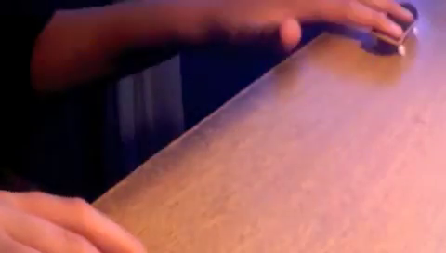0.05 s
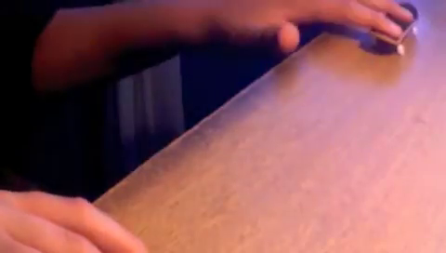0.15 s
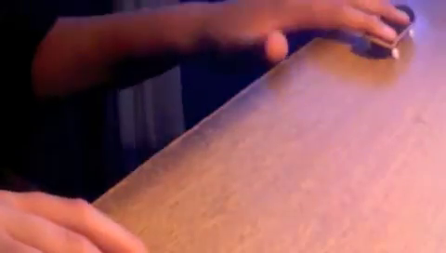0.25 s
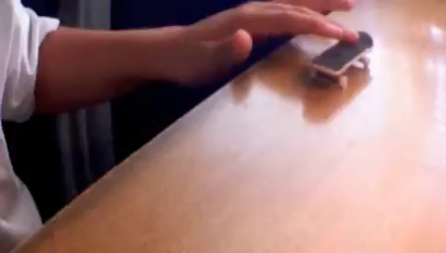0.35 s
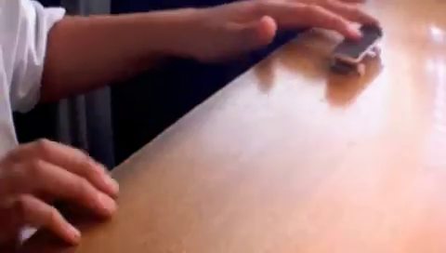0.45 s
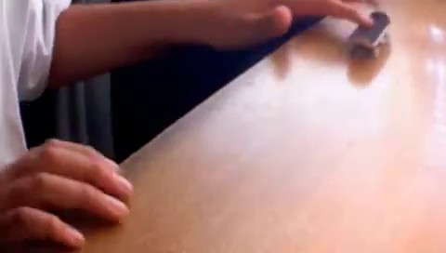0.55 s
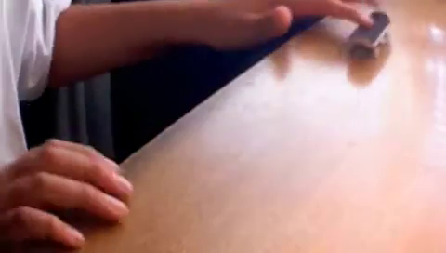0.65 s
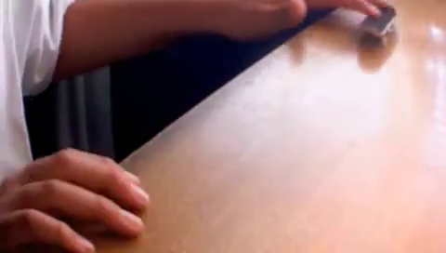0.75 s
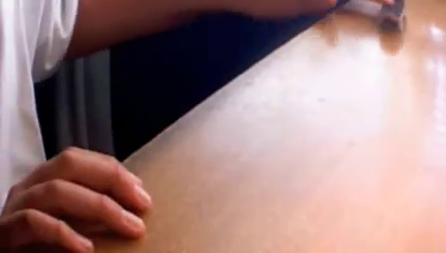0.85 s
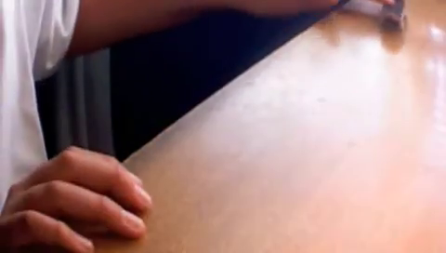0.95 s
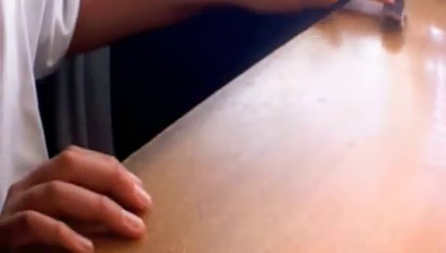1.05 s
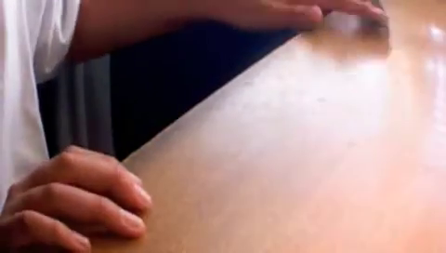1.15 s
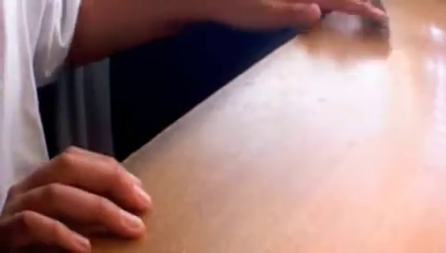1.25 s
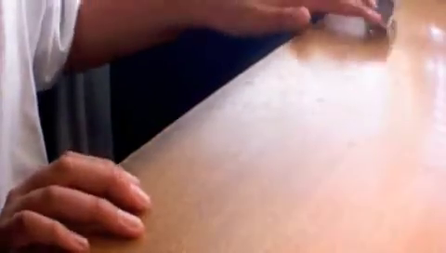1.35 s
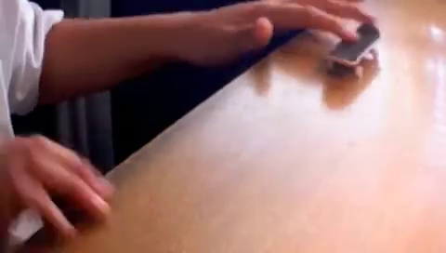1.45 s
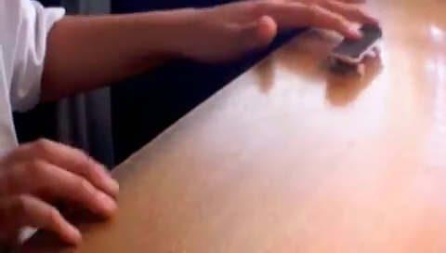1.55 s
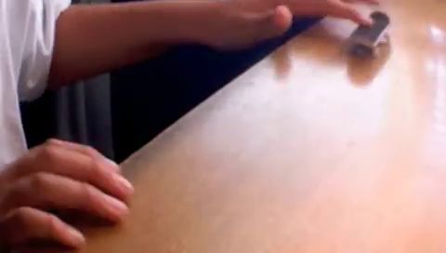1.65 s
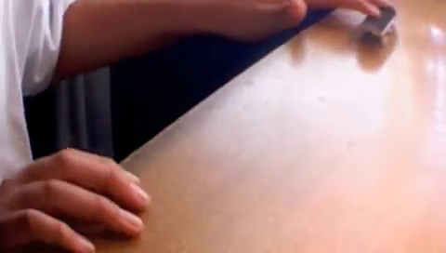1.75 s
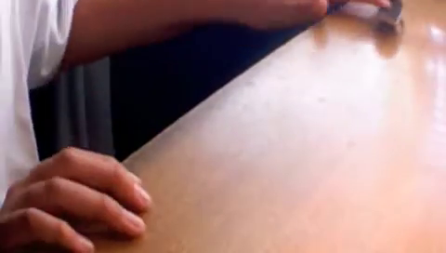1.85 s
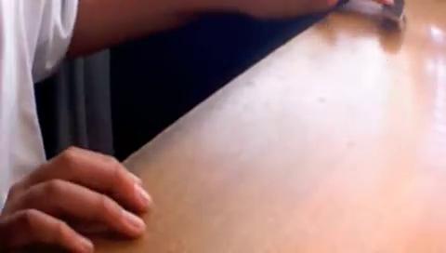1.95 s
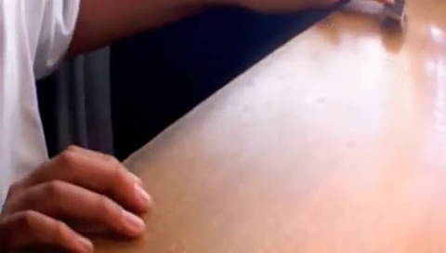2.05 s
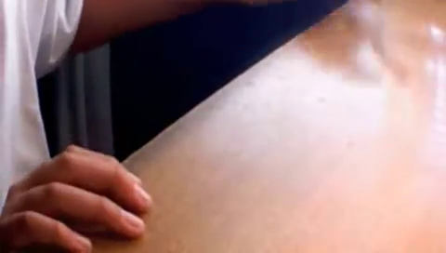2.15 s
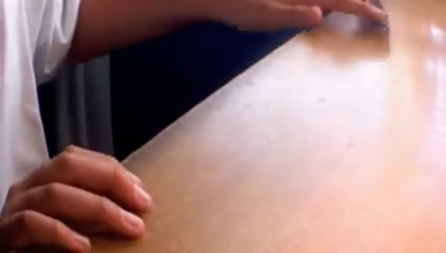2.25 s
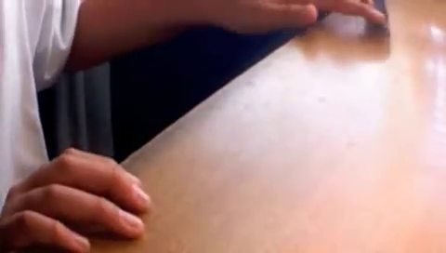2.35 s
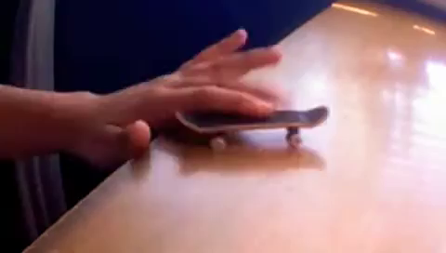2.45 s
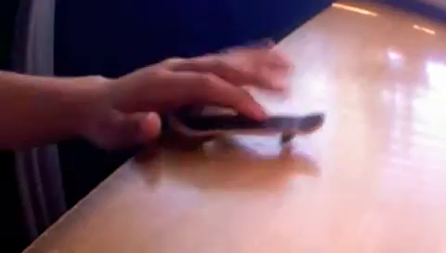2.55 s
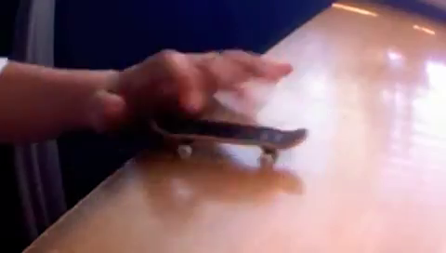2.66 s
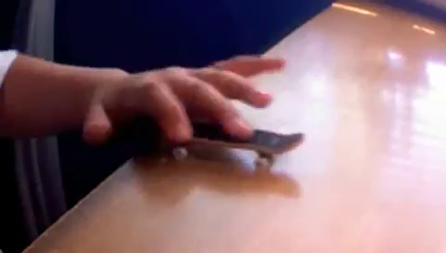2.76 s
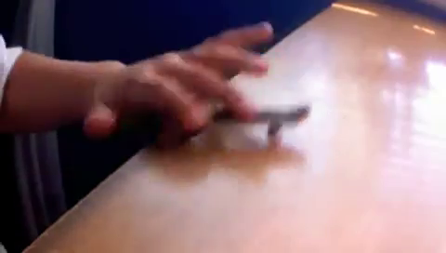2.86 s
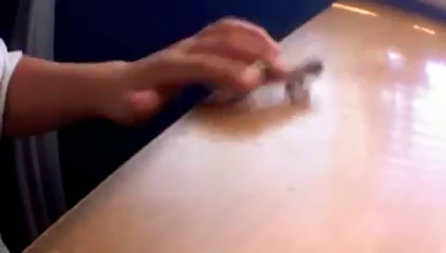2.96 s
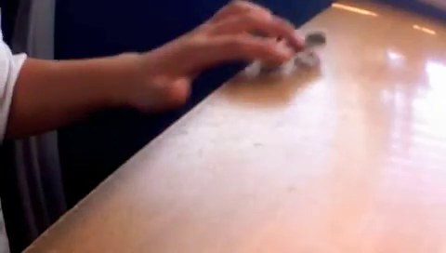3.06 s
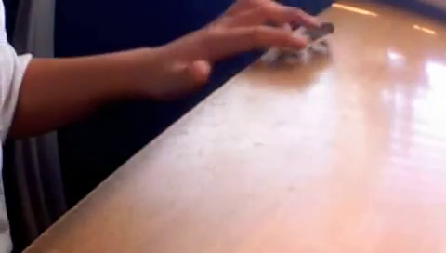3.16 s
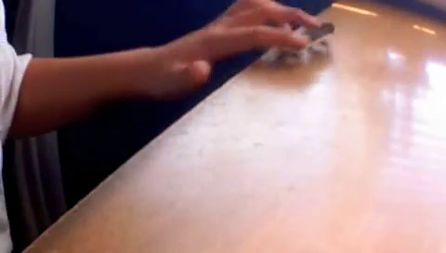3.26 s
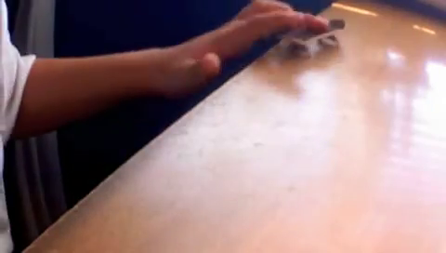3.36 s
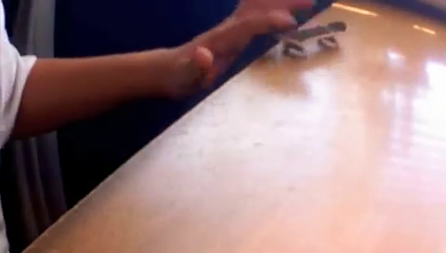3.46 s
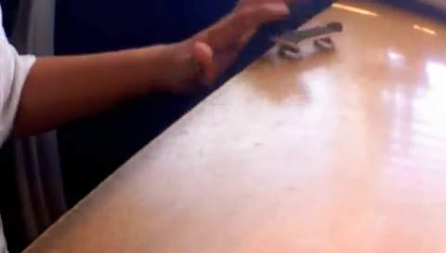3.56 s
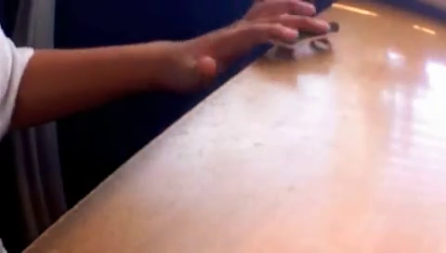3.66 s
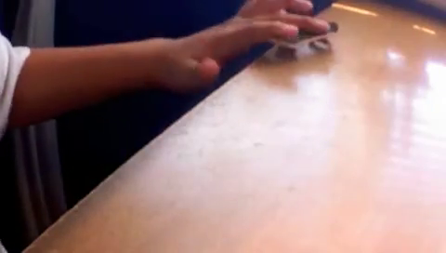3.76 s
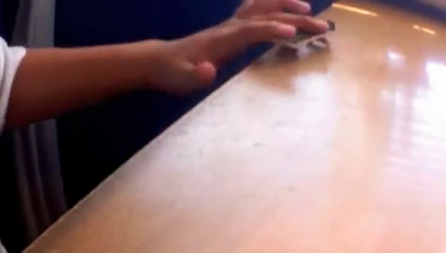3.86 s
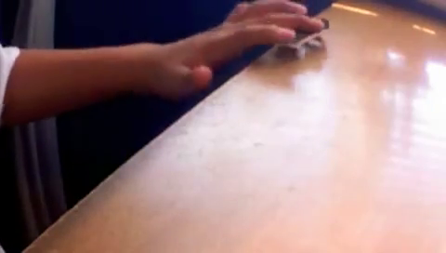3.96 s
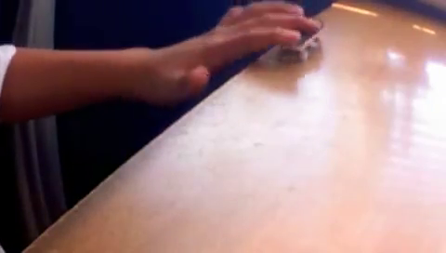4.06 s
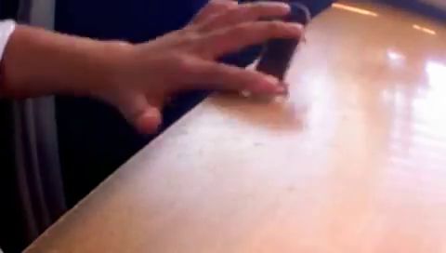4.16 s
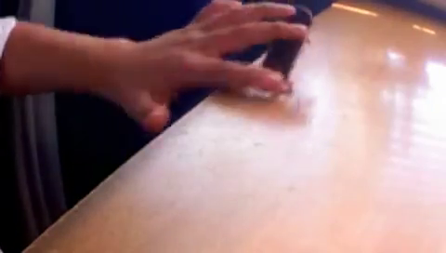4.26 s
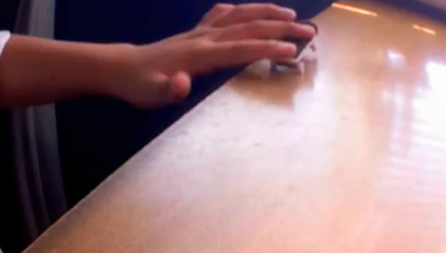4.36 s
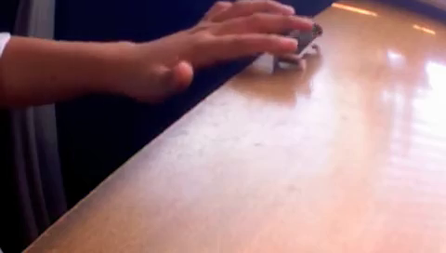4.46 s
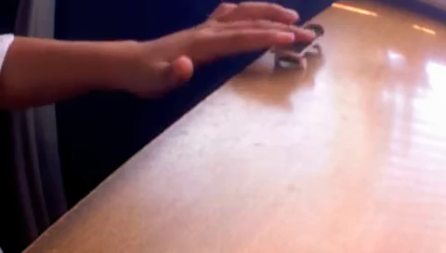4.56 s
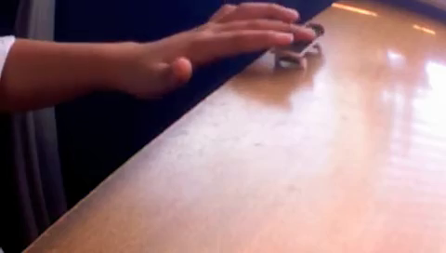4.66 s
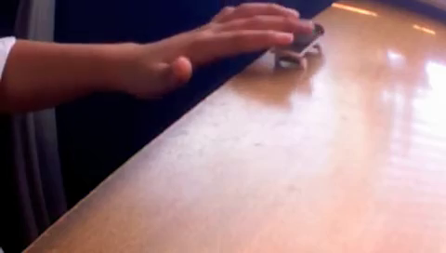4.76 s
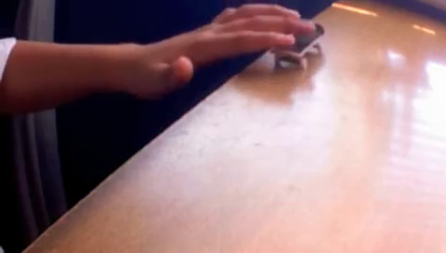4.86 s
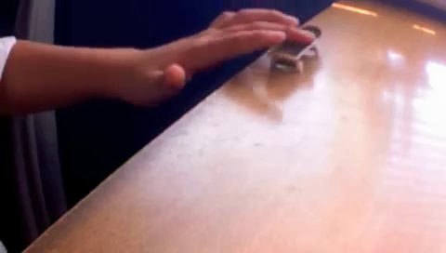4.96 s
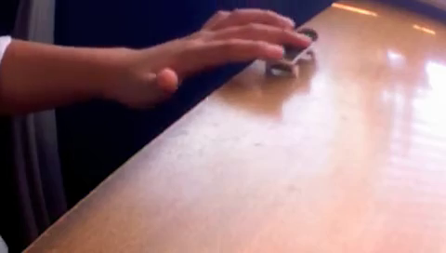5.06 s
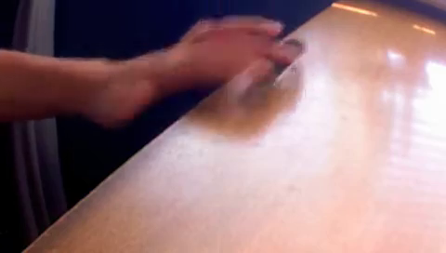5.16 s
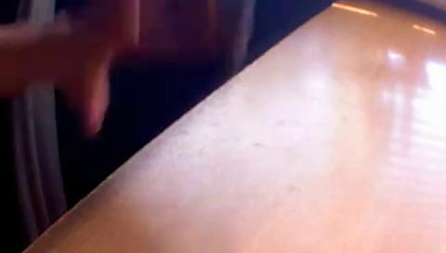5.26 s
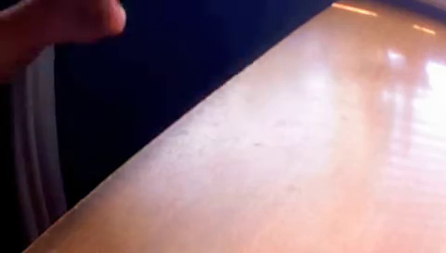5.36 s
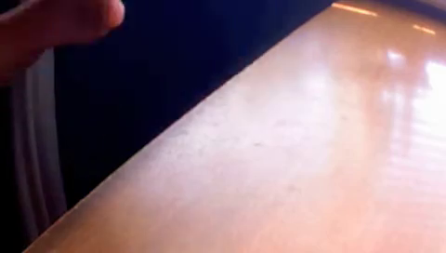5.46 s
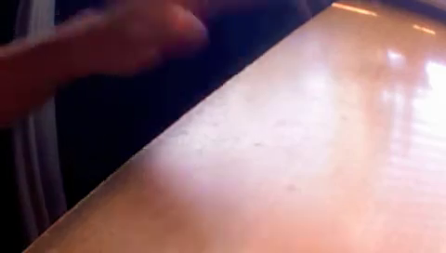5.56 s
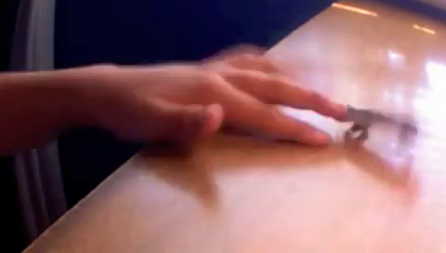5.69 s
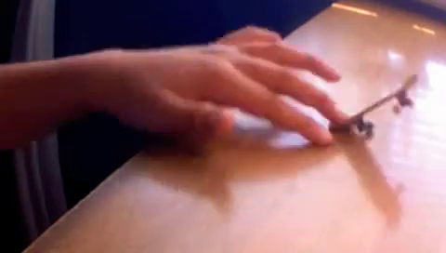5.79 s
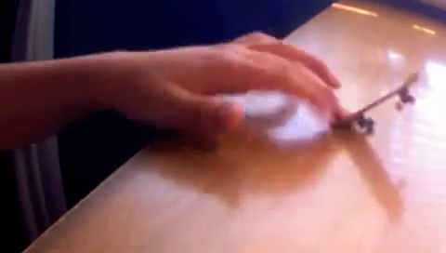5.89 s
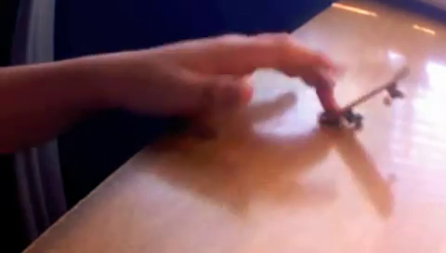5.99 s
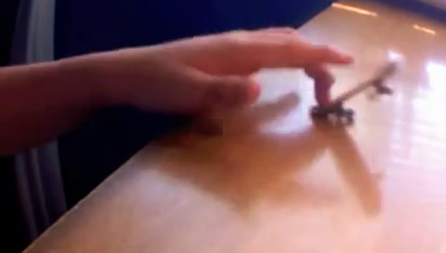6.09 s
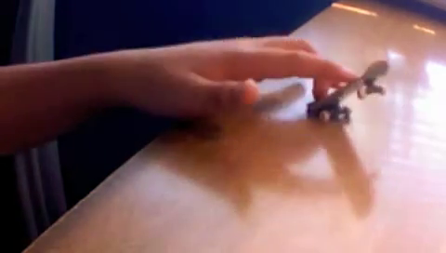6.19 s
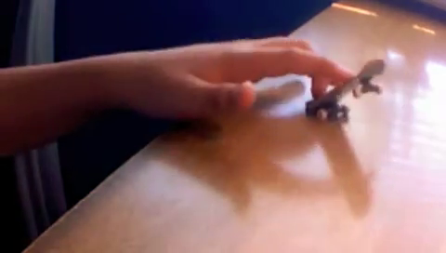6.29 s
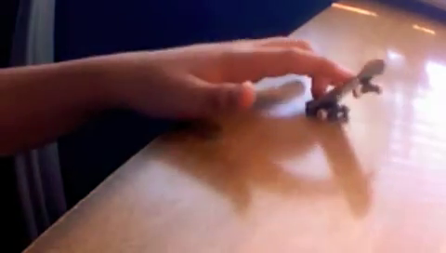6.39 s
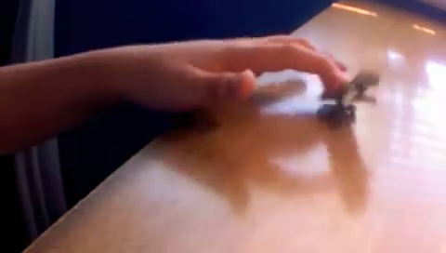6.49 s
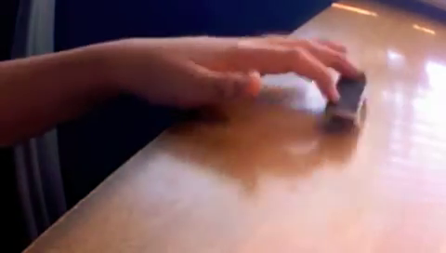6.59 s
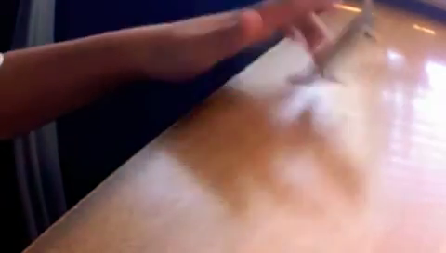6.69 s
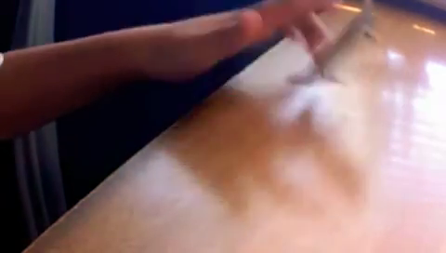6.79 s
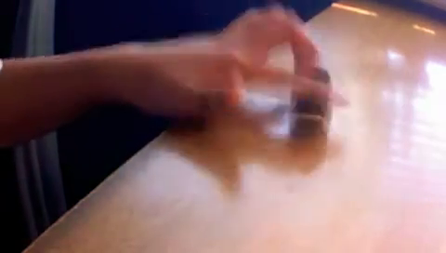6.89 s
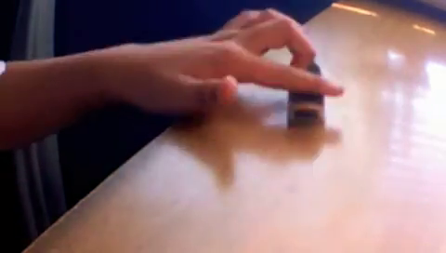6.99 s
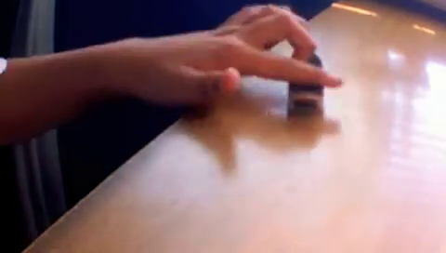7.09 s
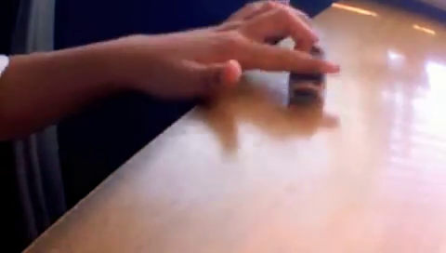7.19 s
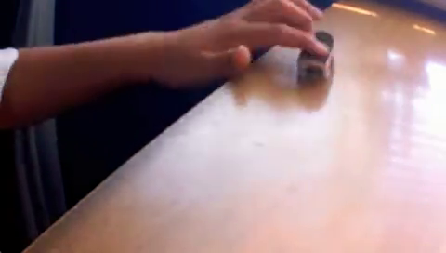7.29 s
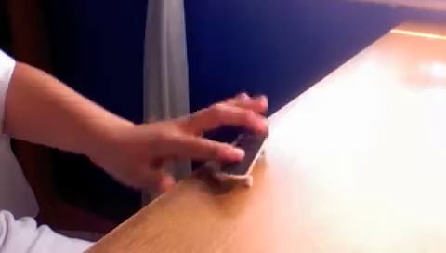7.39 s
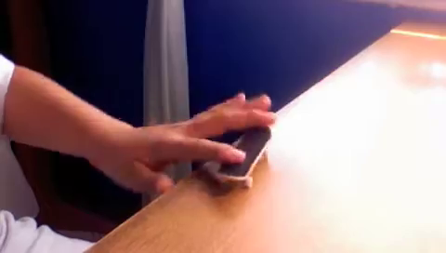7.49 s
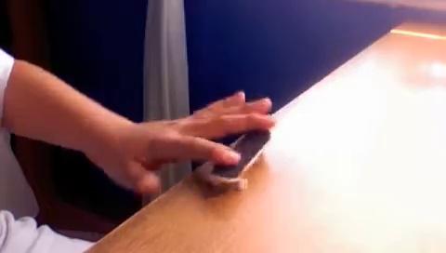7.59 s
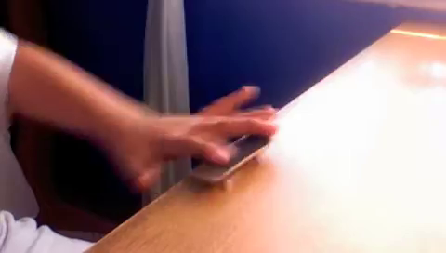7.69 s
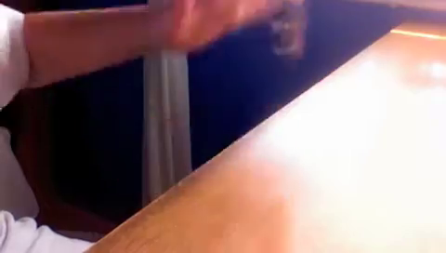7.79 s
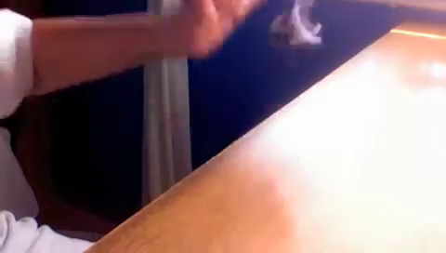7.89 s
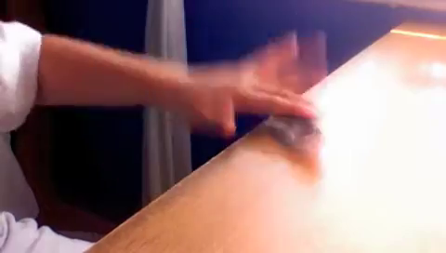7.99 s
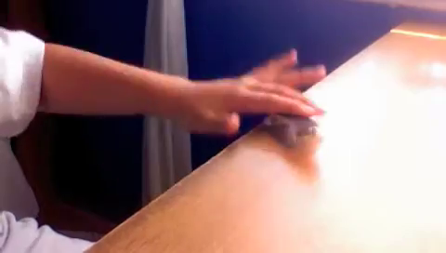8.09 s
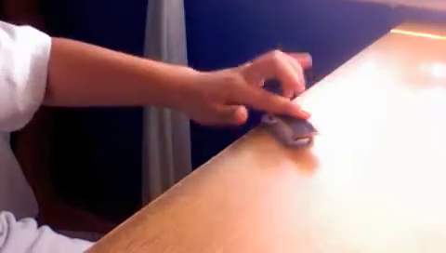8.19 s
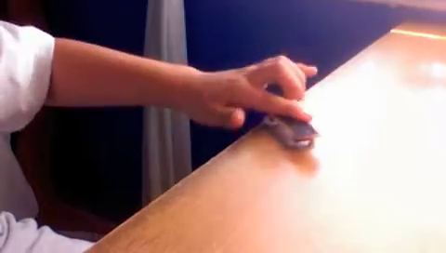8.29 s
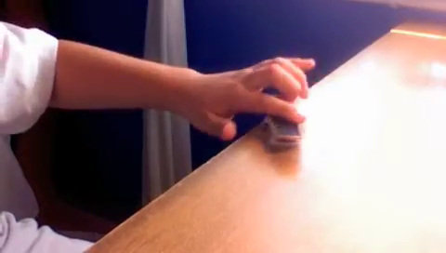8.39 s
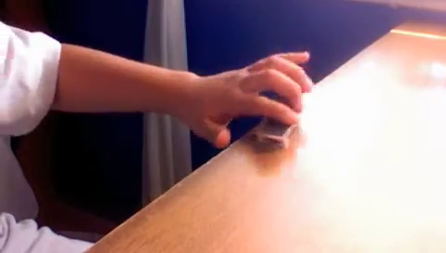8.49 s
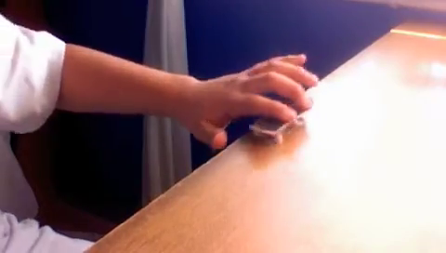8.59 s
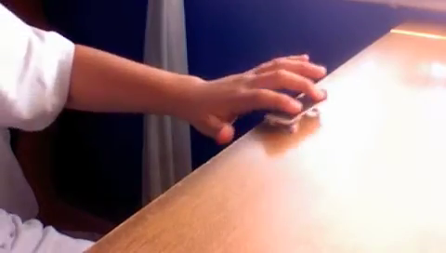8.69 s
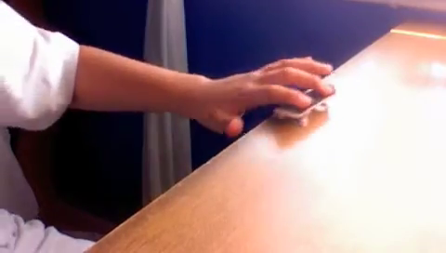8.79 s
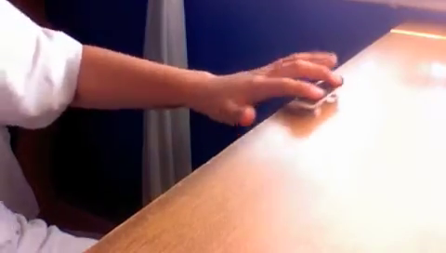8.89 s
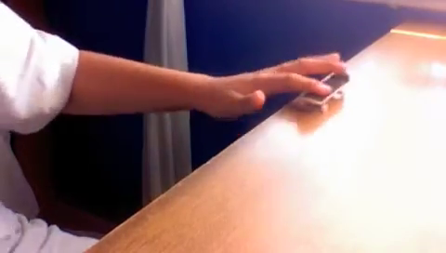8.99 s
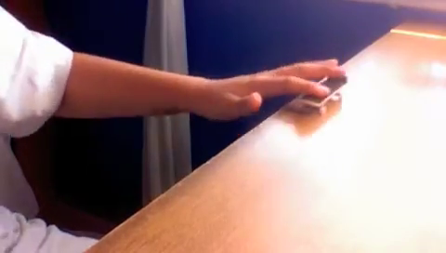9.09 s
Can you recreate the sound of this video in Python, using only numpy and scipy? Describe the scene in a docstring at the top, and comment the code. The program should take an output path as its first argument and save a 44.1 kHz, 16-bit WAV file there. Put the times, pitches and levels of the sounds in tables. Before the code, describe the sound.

Close, brittle snaps and quick double clacks of a finger skateboard on a wooden table, with small wheels rumbling between tricks indoors.

```python
"""Finger skateboard on a wooden table

Two fingers roll, pop and land a toy skateboard close to a small microphone.
Each contact is a burst of noise that cracks, rings the little deck and thumps the tabletop.
Wheels rumble over the grain: rough noise shakes the ringing parts of board and table.
Five stretches are joined by short fades, the third repeats the second; hiss and thin whines lie under all."""
import sys
import numpy as np
from scipy import signal
from scipy.fft import rfft, irfft, next_fast_len
from scipy.io import wavfile
from scipy.ndimage import map_coordinates

SR = 44100
rng = np.random.default_rng(int(sys.argv[2]) if len(sys.argv) > 2 else 0)


def wav_record(signal):
    """Record a signal, one row per channel, as 16-bit PCM in the file named by sys.argv[1]."""
    frames = np.transpose(np.atleast_2d(signal))
    bounded = np.clip(frames, -1, 1)
    # unit amplitude maps onto the largest positive 16-bit level
    quanta = np.round(bounded * 32767).astype(np.int16)
    wavfile.write(sys.argv[1], SR, quanta)


N = 403074  # length in samples

# Resonances of the tabletop: pitch_hz, base width_hz, relative level_db
TABLE_MODES = [(77.6, 59, -10.5), (136.8, 12, 4.5), (180, 28, -2), (232.7, 48, -10), (355.2, 36, -2.5),
               (449, 45, -3), (498.4, 44, -0.5)]
# Bending of the deck: pitch_hz, base width_hz, relative level_db
DECK_MODES = [(584, 14, 2), (720, 106, 5), (837, 52, -11.5)]
# The kicktail, the bent-up end of the deck: pitch_hz, base width_hz, relative level_db
TAIL_MODES = [(1030, 130, -21), (1241, 153, 1.5), (1423, 110, 1.5), (1547, 65, 4.5), (1770, 240, -3)]
# The axles: pitch_hz, base width_hz, relative level_db
AXLE_MODES = [(2101, 250, 0.5), (2550, 47, 2.5), (2890, 180, 2), (3175, 190, 1), (3504, 390, -1)]
# The wheels: pitch_hz, base width_hz, relative level_db
WHEEL_MODES = [(4850, 5600, -6.5), (4950, 120, 4.5), (6550, 440, 6.5), (7000, 6200, -0.5),
               (12400, 4800, -13)]
# Stretches between the joins: start_s, average room_hiss_db, whine_db
STRETCHES = [(0, -67, -40), (0.441, -57.5, 11), (1.507, -72, -12.5), (2.579, -61, 1), (7.424, -69.5, -39.5)]


def contacts():
    """Places every blow of deck and wheels in time; returns its direct and its diffuse sound."""
    # Blows, the first two just before the start: start_s, peak_db of the crack, bright_hz (its main pitch),
    # thump_db, knock_db, treble_db (all three over the crack, trimmed in blow), chatter_ms (time to fall 60 dB)
    hits = [(-.035, -5.5, 2320, -27.5, -18, -24, 22), (-.018, -16, 4000, -6, 2.5, -20, 20),
            (.5165, -38.5, 2000, -14, 0.5, -10.5, 21), (1.0472, -5.5, 5100, -17.5, -23.5, -11.5, 13),
            (1.0523, -12.5, 4800, -18.5, -18, -12.5, 9.8), (1.1586, -46.5, 5020, -14.5, -10, 2, 45),
            (1.174, -14, 2655, -3.5, -23, 2.5, 39), (1.1765, -10, 5200, -8.5, -14, 2, 13),
            (1.1805, -11.5, 2800, -8.5, -26, 2, 18), (1.1874, -16.5, 2900, -3, -12, 0.5, 20),
            (1.1925, -16.5, 2970, -3, -21.5, 7.5, 18), (1.199, -14.5, 2914, -5.5, -4.5, 2, 30),
            (1.2071, -20, 1960, -10, 0.5, 2.5, 16), (1.2347, -23.5, 3430, -6, -7, 8, 14),
            (2.6234, -47, 2850, -6, -13, -16, 20), (2.832, -44, 2780, -20, -14, -25, 45),
            (2.842, -50, 3270, -18, -16, -25, 35), (3.0001, -30, 2530, -10, -16, -7, 4.7),
            (3.226, -42, 4830, -12, -12, -7, 40), (3.468, -37, 2820, -5, -11, 1.5, 40),
            (3.491, -44.5, 1860, 2, -4, 3, 8.3), (3.625, -38, 2970, -11, -1, -10, 16),
            (3.631, -31.5, 2980, -9, -6, -1.5, 14), (4.467, -40.5, 3700, -1.5, -10, 7, 23),
            (4.7893, -37.5, 3430, -4.5, -10, -6, 11), (4.992, -48.5, 1480, -8, -2, -2, 11),
            (5.1587, -38, 1920, -17, -5, -20, 21), (5.2056, -23.5, 3450, -9.5, -7, -1, 25),
            (5.2152, -29.5, 5930, -9, -12, -13.5, 20), (5.2574, -37.5, 6300, -29, -21, -7, 35),
            (5.585, -38.5, 4960, -20.5, -21.5, -0.5, 13), (5.6184, -2.5, 3230, -19, -12.5, -13, 12),
            (5.6187, -7, 6800, -25, -25.5, -16, 9), (5.6205, -9.5, 1880, -18, -16, -23, 12),
            (5.6282, -15, 2820, -5.5, -18.5, -10, 11), (5.635, -5, 4160, -19, -26, -14.5, 11),
            (5.6493, -15.5, 2660, -12, -14.5, -10, 8.3), (5.712, -20.5, 4760, -32, -9.5, -19, 14),
            (5.7195, -33.5, 4660, -5, -7, -14, 15), (5.7953, -37.5, 3370, -12, -2, -5, 36),
            (5.806, -49.5, 1540, -8, 6, -15, 20), (5.8382, -41.5, 3600, -14, -2, -20, 9),
            (5.867, -52, 3500, -16, -14, -10, 8), (6.5177, -21, 2250, -14, -20, -2.5, 34),
            (6.5445, -30.5, 2540, -10, 1, -19, 16), (6.6818, -32, 1730, -12.5, -15.5, -0.5, 10),
            (6.7262, -15, 4417, -13.5, -13.5, -10, 39), (6.8374, -44.5, 6340, -11, -15, 3.5, 11),
            (6.8411, -41.5, 7600, -16.5, -16.5, 1, 20), (6.857, -15, 4260, -7.5, -9.5, 1, 29),
            (6.8643, -15.5, 3650, -17, -12.5, -7, 59), (6.8726, -4.5, 3680, -24.5, -12, -11.5, 8.1),
            (6.877, -8, 1870, -15.5, -6, -11.5, 7), (6.8841, -25, 3700, -3, -1, -10, 16),
            (7.1894, -37.5, 1850, -5, -7, -22, 46), (7.3464, -46.5, 1805, -3, -11, -4.5, 11.6),
            (7.709, -36, 1590, -13, -14, -22, 12.7), (7.7439, -16, 4670, -21, -12, -0.5, 8.4),
            (7.7514, -34, 4000, 3, -13, -1.5, 14), (7.7734, -50, 3860, -5, -16.5, -0.5, 22),
            (7.9974, -44, 6700, -23.5, -22.5, -5.5, 20), (8.0083, -36, 8160, -16, -34.5, -7, 15),
            (8.0172, -13, 6800, -35, -13.5, -10.5, 35), (8.0202, -7, 4160, -12.5, -10.5, 2, 17),
            (8.0238, -7.5, 3180, -12, -8, -12, 15), (8.0301, -21, 2790, 0, -1, -10, 6.8),
            (8.1245, -27.5, 3720, -29, -13.5, 6.5, 10.5), (8.1353, -35, 3770, -2, -16, -4, 16),
            (8.45, -53.5, 2200, -7, -3, -5, 14), (8.4818, -51, 1700, -16, 0, -7, 13),
            (8.5098, -48, 3210, -18, -7, 6, 16), (8.5257, -55, 1800, 2, 8, -13, 19),
            (8.7408, -35, 3630, -19, -7, 4, 21), (8.9137, -50, 2845, -3, -10, -2, 13)]
    out = np.zeros((2, N + 2 * SR))  # one spare second at each end
    for start_s, peak_db, *character in hits:
        sound = blow(peak_db, *character)
        first = SR + round(start_s * SR)
        out[:, first:first + sound.shape[1]] += amp(peak_db) * sound
    return out[:, SR:SR + N]


def blow(peak_db, bright_hz, thump_db, knock_db, treble_db, chatter_ms):
    """One push with noisy chatter excites metal, deck, air and table; each answers at its own resonances."""
    push, force = chatter_force(peak_db, bright_hz, chatter_ms / 1000)

    metal = AXLE_MODES + WHEEL_MODES
    ring = peaked(filtered(force[0], modes(favoured(metal, bright_hz, fall_db=27.5, widen=1.2))))
    broad_and_narrow = together([(bright_hz, .65 * bright_hz, 0)], [(bright_hz, .13 * bright_hz, 6)])
    crack = peaked(filtered(force[1], broad_and_narrow))

    knock_hz = 1350 * 2 ** (.01 * peak_db)  # lighter blows favour lower modes
    bent = favoured(DECK_MODES + TAIL_MODES, knock_hz, fall_db=9.0, widen=2.0)
    knock = amp(knock_db) * peaked(filtered(force[2], modes(bent)))
    fizz = peaked(filtered(force[3], lambda hz: modes([(10500, 7000, 0)])(hz) ** 2))
    direct = peaked(0.55 * ring + crack) + knock + amp(treble_db - 5.5) * fizz

    thump_hz = 247 * 2 ** (.01 * peak_db)
    # the heavy top answers to changes of the push
    thump = peaked(filtered(np.gradient(push), modes(favoured(TABLE_MODES, thump_hz, fall_db=4.0))))

    # the room hears the whole board, not one spot
    whole_board = together([(2300, 2600, -3)], [(bright_hz, 1.1 * bright_hz, 0)])
    board = peaked(filtered(force[0], whole_board))
    room_db = -5 + 0.08 * peak_db  # a smaller room share for lighter blows
    diffuse = amp(room_db) * room(board + 0.8 * knock + amp(treble_db - 6) * fizz)
    diffuse += amp(thump_db - 2.5) * (thump + 0.55 * room(thump))
    return np.array([direct, diffuse])


def chatter_force(peak_db, bright_hz, chatter_s):
    """The push rises, then dies away; four separate noises follow it, as rough surfaces chatter."""
    t = np.arange(SR // 4) / SR
    # lighter blows, and those duller than about 1805 Hz, build up more slowly
    rise_s = .0002 * amp(-0.62 * peak_db) * (1 + (1805 / bright_hz) ** 7)
    decay_db = -60 * np.maximum(t - rise_s, 0) / max(chatter_s, .002)
    push = np.minimum(t / rise_s, 1) * amp(decay_db)
    force = rng.standard_normal((4, len(t))) * push
    force[:, round(rise_s * SR)] += 6 * min(.0003 / rise_s, 1)  # one hard kick, weaker after a slow rise
    return push, force


def room(x):
    """The room answers with a fresh diffuse tail; each frequency dies at its own speed."""
    # How fast the tail dies: pitch_hz, fall_60_db_s
    decay_times = [(150, 0.22), (700, 0.16), (2000, 0.18), (5000, 0.16), (13000, 0.12)]
    # Colour of the tail: pitch_hz, relative level_db
    echo_colour = [(100, -7.5), (500, -4.5), (2000, -3.5), (5000, -1.5), (14000, -6)]
    hz, t, noise = signal.stft(rng.standard_normal(len(x)), SR, nperseg=256)
    hz = hz[:, None]
    level_db = along(echo_colour, hz) - 60 * t / along(decay_times, hz)
    tail = signal.istft(noise * amp(level_db), SR, nperseg=256)[1]
    delayed = np.pad(x, (90, 0))  # about 2 ms
    return signal.fftconvolve(delayed, tail / np.linalg.norm(tail))[:len(x)]


def rolling():
    """Bumps in the wood grain shake every part of board and table; finger pressure shifts which modes speak."""
    gains, table_hz, tail_hz, axle_hz = motion()
    parts = (favoured(DECK_MODES, 715, fall_db=12.5),
             favoured(TABLE_MODES, table_hz, fall_db=8),
             favoured(TAIL_MODES, tail_hz, fall_db=116.0),
             favoured(AXLE_MODES, axle_hz, fall_db=32.5),
             favoured(WHEEL_MODES, 6600, fall_db=3))
    shared, out = wobble(60), np.zeros(N)
    for gain, part in zip(gains, parts):
        grit = 1 + (rng.random(N) < .02) * 4.6 * rng.random(N)  # rare larger bumps
        uneven = amp(1.2 * shared + 1.5 * wobble(90))
        bumps = rng.standard_normal(N) * grit * uneven
        sizes = [amp(db) * np.sqrt(width) for _, width, db in part]  # a wider mode gathers more noise
        voices = [size * resonant(bumps, hz, width) for (hz, width, _), size in zip(part, sizes)]
        out += gain * sum(voices) / np.sqrt(sum(size ** 2 for size in sizes))
    return out


def motion():
    """Rolls and scuffs set the gains of deck, table, tail, axles and wheels; pressure picks their modes."""
    # Long rolls, a list for each: time_s, level_db, table_rumble_db over that level, finger pressure (0-1)
    long_rolls = [
        [(.454, -54.5, 2, 0.1), (.505, -59.5, 0, 0.8), (.522, -50, 4.5, 0.1), (.55, -43, 1.5, 0.07),
         (.596, -41, -5, 0.17), (.63, -44, 3, 0.36), (.665, -41, -1.5, 0.38), (.69, -47.5, 3, 0.66),
         (.718, -42, -4.5, 0.8), (.798, -39, 0, 0.57), (.926, -59, 6.5, 0.4), (.99, -56.5, 5.5, 0.6),
         (1.02, -59, 3, 0.4)],
        [(2.6, -63, -12.5, 0.33), (2.644, -59.5, -17, 1), (2.73, -79, 0, 0.3), (2.86, -57.5, -12, 0.32),
         (2.962, -43.5, -6.5, 0.4), (3.025, -43.5, -7, 0.45), (3.082, -48, -3, 0.5), (3.118, -53.5, 1, 0.53),
         (3.19, -55, 3.5, 1), (3.326, -78.5, 18, 0.57), (3.44, -95, -3, 0.4)],
        [(6.96, -61, -8, 0.7), (7.01, -64, -7, 0.4), (7.154, -56.5, 5, 0), (7.18, -57, 2, 0.2),
         (7.205, -56, 0, 0.07), (7.302, -59.5, 0.5, 0.45), (7.344, -53, 4.5, 0.48), (7.41, -59.5, -6, 0.14)],
        [(8.3, -86, 19, 0.16), (8.37, -71, 4, .3), (8.47, -73.5, 5.5, 0.55), (8.532, -55.5, 1, 0.7),
         (8.58, -74, 11, 0.44), (8.662, -65.5, 1, 0.25), (8.71, -64.5, -17, 0), (8.745, -60, 3, 0.36),
         (8.83, -60, 2, 0.1), (8.892, -62, 4.5, 0.43), (8.938, -60.5, 3.5, 0), (9.02, -85, 20, 0),
         (9.13, -73.5, -2.5, 0.15)],
    ]
    # Short scuffs: start_s, swell_s, hold_s, fade_s (swell and fade span 30 dB), tail_scrape_db,
    # deck_db, table_db, axles_db (all three over the tail), tail_hz
    short_scuffs = [(1.043, 0.021, 0.011, 0.044, -33, 0, 0.5, -4.5, 1360),
                    (1.356, .1, 0.023, 0.22, -51, 3, 4, -3, 1260),
                    (1.445, 0.068, 0.016, 0.19, -59.5, -11, 11.5, 1.5, 1210),
                    (2.755, 0.042, 0.004, 0.028, -60.5, 7, 9.5, 2, 1260),
                    (2.827, 0.013, 0.025, 0.044, -63, -2, 5, 15, 1260),
                    (4.061, 0.082, 0.03, 0.12, -43.5, -4.5, -1.5, -8.5, 1420),
                    (4.239, 0.066, .005, 0.21, -57, -0.5, -7, -13, 1400),
                    (4.972, 0.16, 0.025, 0.17, -62, -1, 2, -4, 1340),
                    (5.172, 0.057, 0.03, 0.025, -37.5, -3, -9, -6, 1470),
                    (5.979, 0.095, .005, 0.076, -57, 2, -23, -8, 1200),
                    (6.055, 0.032, 0.0083, 0.11, -60, 4, 3, -6.5, 1200),
                    (6.483, 0.17, 0.09, 0.09, -56.5, 2, -9, -10, 1450),
                    (6.684, 0.017, 0.0031, 0.043, -44.5, 0, -17, -10, 1530),
                    (6.723, 0.015, 0.013, .02, -31, -3.5, -10, -14, 1400),
                    (7.643, 0.12, 0.027, 0.11, -65.5, 6, 6, -4.5, 1095),
                    (7.709, 0.026, 0.021, 0.025, -42, -14.5, -7, -6, 1600)]
    deck_db, tail_db, axle_db, wheel_db = 8, -1.5, -2.5, -14  # over the roll's level
    damp_db = 23  # full pressure mutes the deck by this much
    scuff_wheels_db = -9.5  # wheels over the axles

    t, gains = np.arange(N) / SR, np.zeros((5, N))
    press, tail_hz = np.zeros(N), np.full(N, 1194.0)
    for rows in long_rolls:
        s, *columns = np.transpose(rows)
        edge = np.clip(np.minimum(t - s[0] + 0.012, s[-1] + 0.0085 - t) / .008, 0, 1)
        db, rumble_db, weight = (np.interp(t, s, column) for column in columns)
        weight = np.clip(weight, 0, 1) * (edge > 0)
        press += weight
        over_db = [deck_db - damp_db * weight, rumble_db, tail_db + 0 * t, axle_db + 0 * t, wheel_db + 0 * t]
        gains += edge * amp(db + np.array(over_db))

    for start, swell, hold, fade, db, deck, table, axles, hz in short_scuffs:
        outside = np.maximum((start - t) / swell, (t - start - hold) / fade)
        shape_db = db - 30 * np.maximum(outside, 0)
        near = np.flatnonzero(shape_db > -110)
        louder = amp(shape_db[near]) > gains[2, near]
        tail_hz[near[louder]] = hz  # the scuff sets the tail's pitch where it is louder
        over_db = np.array([[deck], [table], [0], [axles], [axles + scuff_wheels_db]])
        gains[:, near] += amp(shape_db[near] + over_db)

    # from no pressure to full pressure
    table_hz = 173.7 * (342 / 173.7) ** press
    axle_hz = 2900 * (2170 / 2900) ** press
    return gains, table_hz, tail_hz, axle_hz


def background():
    """Room hiss and the microphone's own are shaped noise; steady electrical whines are wavering sines."""
    # Colour of the room hiss: pitch_hz, relative level_db per Hz
    hiss_colour = [(20, -43), (48, -15.5), (100, -9), (160, -5.5), (215, -9), (300, -7.5), (1820, -12.5),
                   (5000, -21.5), (8000, -27), (12500, -40.5), (16400, -45)]
    # Colour of the microphone's own hiss: pitch_hz, relative level_db per Hz
    own_colour = [(20, -34.5), (300, 2.5), (3000, 1), (10000, -1), (16400, -9)]
    # Whines: pitch_hz, level_db (rms, before the stretch's whine level is added)
    whine_tones = [(1238, -79), (1755, -79), (8000, -78), (12225, -85), (12285, -78), (15251, -93)]
    t = np.arange(N) / SR
    hiss = unit(filtered(rng.standard_normal(N), lambda hz: amp(along(hiss_colour, hz))))
    own = amp(-78) * unit(filtered(rng.standard_normal(N), lambda hz: amp(along(own_colour, hz))))
    tones = [np.sqrt(2) * amp(db + 1.3 * wobble(24)) * np.sin(2 * np.pi * hz * t) for hz, db in whine_tones]
    whine_db = per_stretch(column=2)
    whines = amp(whine_db) * sum(tones[:-1])
    top = amp(.12 * whine_db + 3 * wobble(15)) * tones[-1]  # the highest is faint but stays throughout
    return amp(per_stretch(column=1) + .7 * wobble(10)) * hiss + own + whines + top


def per_stretch(column):
    """A column of the stretch list as steps, one value per sample."""
    rows = np.array(STRETCHES)
    index = np.searchsorted(rows[:, 0], np.arange(N) / SR, side="right") - 1
    return rows[index, column]


def joined(x):
    """The second stretch plays twice; the level fades down before each join and quickly back up."""
    t, start = np.arange(N) / SR, round(STRETCHES[1][0] * SR)
    again = 47086  # samples from the first playing to the second
    y = np.concatenate([x[:start + again], x[start:start + again], x[start + 2 * again:]])
    for cut, *_ in STRETCHES[1:]:
        fade = np.where(t < cut, (cut - t) / 0.13, (t - cut) / 0.058)  # seconds down, seconds up
        y = y * np.clip(fade, .02, 1) ** 0.88
    return y


def favoured(table, hz, fall_db, widen=1):
    """A contact favours modes near hz: the others lose fall_db per squared octave away."""
    return [(c, widen * width, db - fall_db * np.log2(c / hz) ** 2) for c, width, db in table]


def modes(table):
    """Response of resonances (pitch_hz, width_hz, level_db) that ring only after they are struck."""
    def response(f):
        total = 0
        for k, (hz, width, db) in enumerate(table):
            damping = 1j * f * width
            total = total + (-1) ** k * amp(db) * damping / (hz * hz - f * f + damping)  # signs alternate
        return total
    return response


def together(first, second):
    """Two sets of resonances sounding side by side, added with the same sign."""
    return lambda hz: modes(first)(hz) + modes(second)(hz)


def resonant(x, hz, width):
    """x through one resonance twice, for steep skirts; rms 1."""
    b, a = signal.iirpeak(hz, hz / (1.5 * width), SR)
    return unit(signal.lfilter(b, a, signal.lfilter(b, a, x)))


def filtered(x, response):
    """x times a complex response of frequency."""
    m = next_fast_len(x.shape[-1] + 4096)
    spectrum = rfft(x, m) * response(np.fft.rfftfreq(m, 1 / SR))
    return irfft(spectrum, m)[..., :x.shape[-1]]


def along(points, hz):
    """Reads a curve of (pitch_hz, value) points on a log pitch axis."""
    f, value = np.transpose(points)
    return np.interp(np.log(hz + 1), np.log(f + 1), value)


def wobble(rate):
    """A smooth random curve, rate knots a second."""
    return map_coordinates(rng.standard_normal(int(N * rate / SR) + 4), [np.arange(N) * rate / SR])


def amp(db):
    """Decibels to a plain factor."""
    return 10 ** (np.asarray(db) / 20)


def unit(x):
    """Scales to rms 1."""
    return x / np.sqrt(np.mean(x ** 2) + 1e-20)


def peaked(x):
    """Scales to peak 1."""
    return x / np.max(np.abs(x))


def scene():
    """Adds all sources and spreads them: direct sound by a small delay, diffuse sound by treble width."""
    # Width of the diffuse sound, mostly in the treble: pitch_hz, side_db over the middle before the flicker
    diffuse_width = [(300, -72.5), (2400, -49.5), (4400, -38.5), (8100, -11.5), (15000, -6)]
    lag_s = 11e-6  # direct sound reaches the left later, by about this much before the flicker
    direct, diffuse = contacts()
    direct = joined(direct)
    diffuse = joined(diffuse + rolling() + background())

    def lag_side(hz):
        return -1j * np.tan(np.pi * hz * lag_s) * hz ** 2 / (hz ** 2 + 1500 ** 2)  # little in the bass

    side = filtered(direct, lag_side)
    side += filtered(diffuse, lambda hz: -1j * amp(along(diffuse_width, hz)))
    side *= amp(4 * wobble(40) - 0.5)  # the width flickers
    return direct + diffuse + np.array([side, -side])


def record(dry):
    """The microphone fades at the very top, and nothing is kept above the band limit."""
    top_hz = 16500
    fade = [(14500, 0), (15600, -11.5), (15900, -12), (16500, -24.5)]  # pitch_hz, level_db
    return filtered(dry, lambda hz: amp(along(fade, hz)) * (hz < top_hz))


dry = scene()
out = record(dry)
wav_record(out)
```